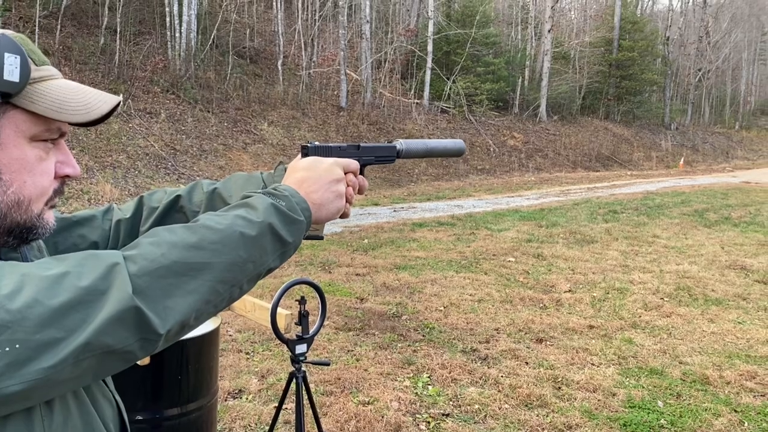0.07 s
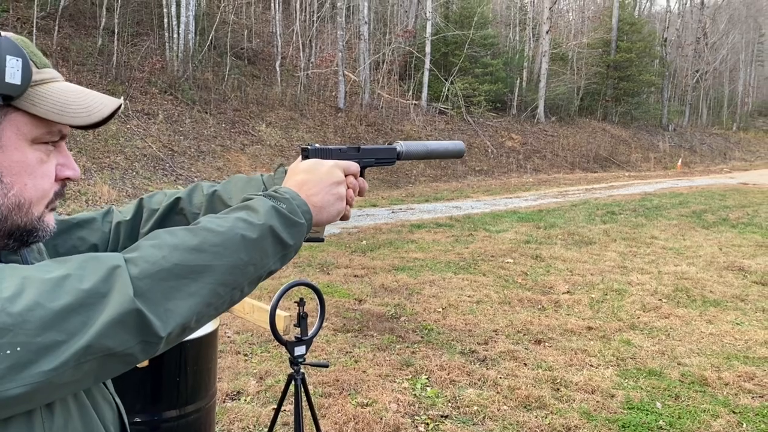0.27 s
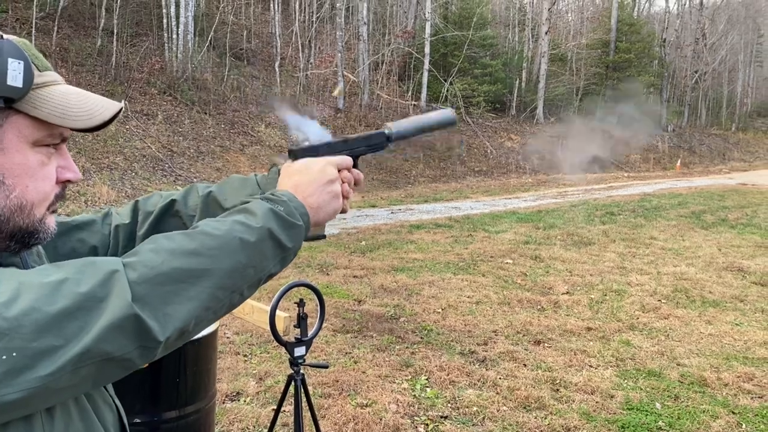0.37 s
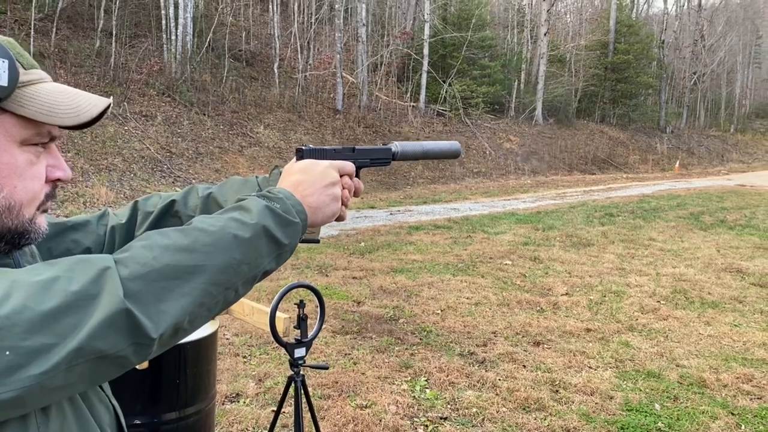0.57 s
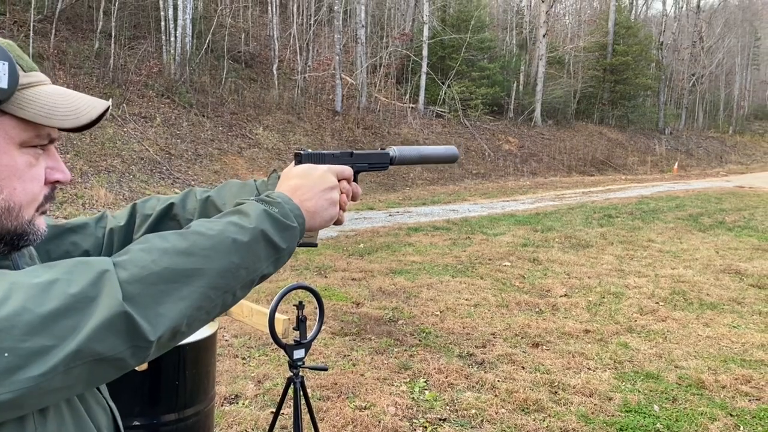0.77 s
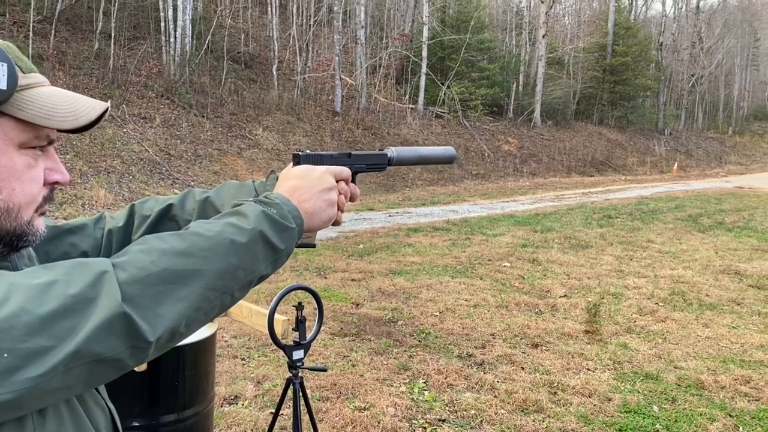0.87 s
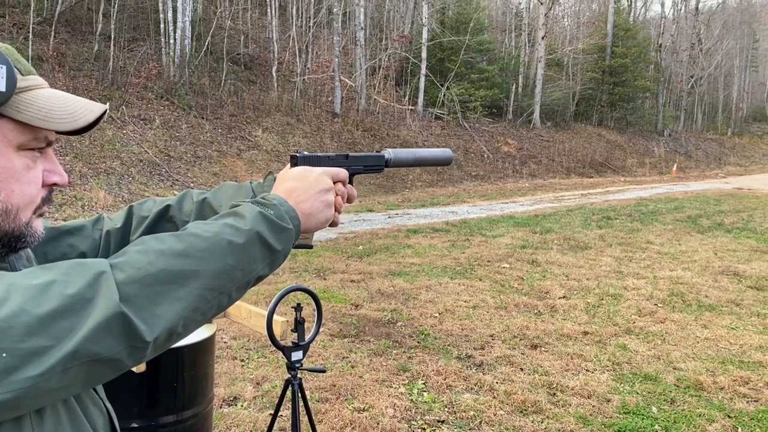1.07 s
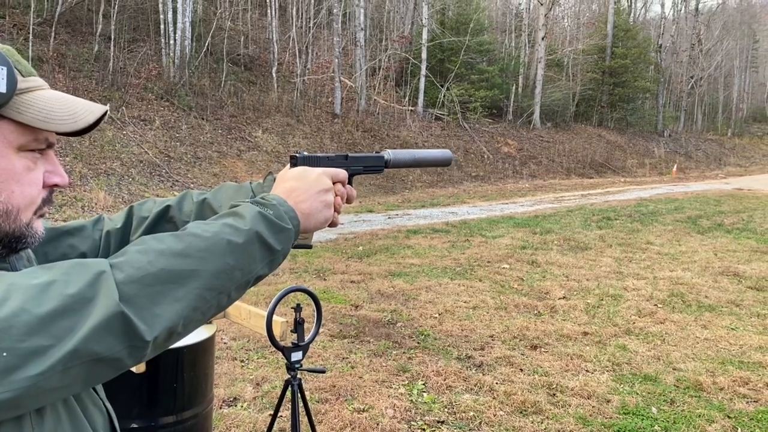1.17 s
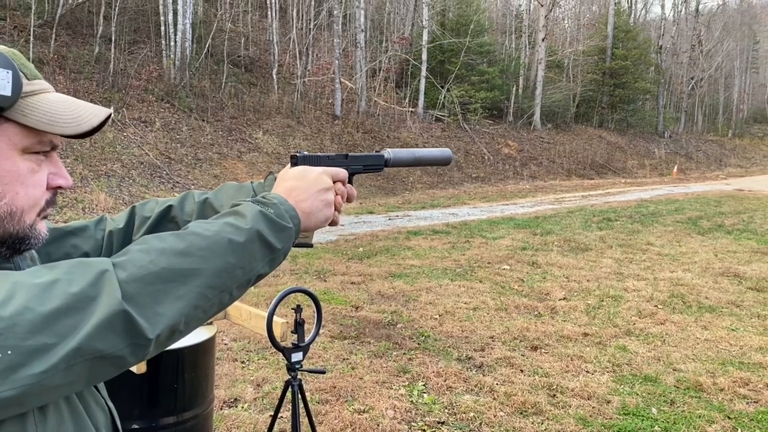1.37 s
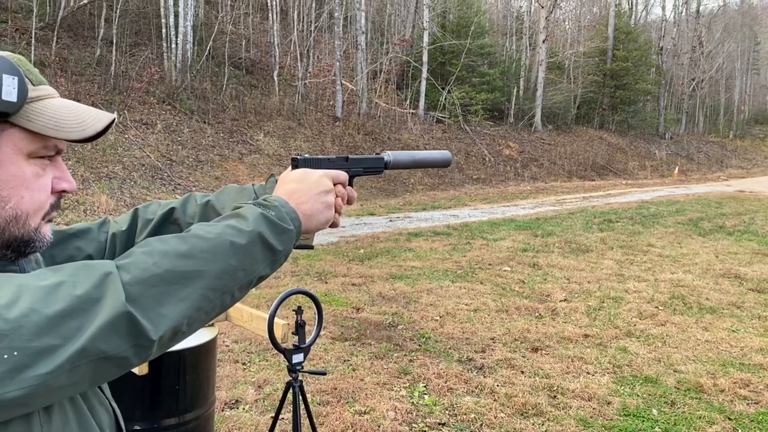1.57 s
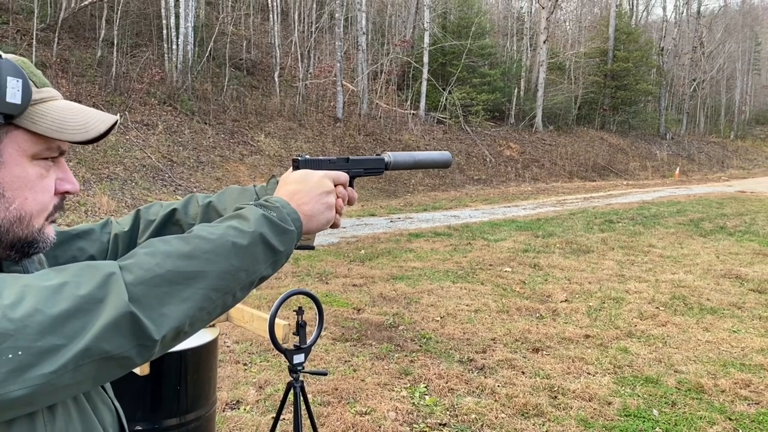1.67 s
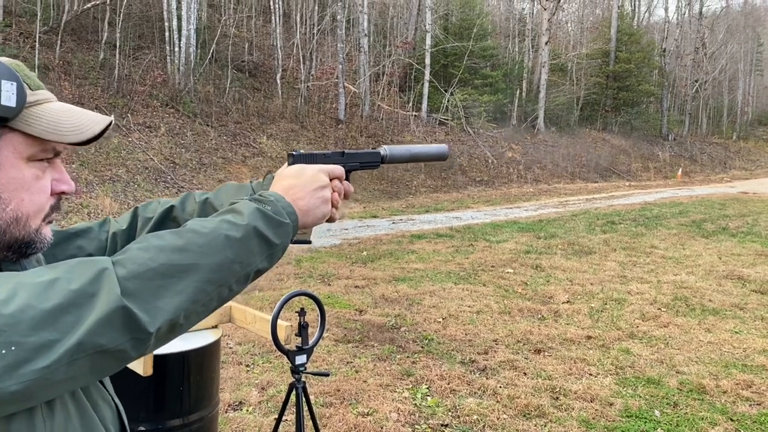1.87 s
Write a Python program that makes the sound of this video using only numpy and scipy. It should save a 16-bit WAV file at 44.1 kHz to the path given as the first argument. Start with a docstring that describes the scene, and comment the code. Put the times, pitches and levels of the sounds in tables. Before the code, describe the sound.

At a grassy outdoor range, a silenced pistol pops early and again near the end, close to the microphone. Its slide snaps shut, woods return a hissy tail, and faint metallic ticks sound over low wind.

```python
"""A grassy range below a wooded bank: two suppressed pistol shots are heard close to a hand-held phone.
Each is a short hiss of gas with uneven cracks and blunt low thumps, made of shaped noise and dying swings.
The slide rattles in lumpy noise and slams shut with a ring; noise echoes come off the bank and trees.
Small ticks (probably the trigger resetting and the spent case landing) are ringing tones and bands of noise.
Light wind is a lumpy rumble with low swings that buffet the microphone, over a quiet bed of air."""
import sys
import numpy as np
from scipy import signal
from scipy.fft import rfft, irfft
from scipy.io import wavfile
from scipy.ndimage import uniform_filter1d

SR = 44100
rng = np.random.default_rng(int(sys.argv[2]) if len(sys.argv) > 2 else 0)


def magnitude_from_level(level_db):
    """Linear magnitude for a level in decibels (20 dB per decade)."""
    exponent = np.asarray(level_db, float) / 20
    return 10 ** exponent


def generate_wav(sig):
    """Save sig (samples, or channels by samples) to the path in sys.argv[1] as 16-bit PCM at SR."""
    pcm = np.round(np.clip(np.atleast_2d(sig).T, -1, 1) * 32767).astype(np.int16)
    wavfile.write(sys.argv[1], SR, pcm)


N = 83790  # length in samples

# The two shots. Each row: start in seconds, gas level in dB, seconds until the slide shuts,
# brightness in dB per octave, level in dB of the hiss just ahead before it is dulled.
SHOTS = [(0.2292, -14.5, .0465, -2.5, -10.5), (1.6203, -14, .0463, 0.73, -25.5)]
# Tone colour of the gas blast. Each row: frequency in Hz, relative strength in dB per Hz.
BLAST_COLOUR = [(250, -34), (800, -7.5), (2930, -14.5), (3650, -9.5), (4460, -18.5), (7260, -17),
                (11200, -20.5), (13700, -33), (15200, -26), (16300, -49)]
# Tone colour of the slide's metal noise. Each row: frequency in Hz, relative strength in dB per Hz.
SLIDE_COLOUR = [(120, -41.5), (200, 0.5), (844, -12), (1940, -1.5), (7600, -9), (8970, -21), (10600, -11.5),
                (15600, -22.5), (16500, -39)]
# Slow rise and fall of the wind. Each row: time in seconds, level of the rumble in dB.
GUST = [(0, -50), (.1, -58), (0.202, -47), (.3, -63), (.42, -55), (0.579, -54), (0.701, -47.5),
        (.85, -45.5), (.93, -52), (1.03, -47), (1.13, -44), (1.21, -57.5), (1.27, -45), (1.34, -58),
        (1.42, -44), (1.56, -51.5), (1.72, -53.5), (1.9, -54.5)]


def evened(x):
    """Scales a signal so that its average power (mean square) is one."""
    return x / np.sqrt(np.mean(x ** 2) + 1e-20)


def read(points, hz):
    """Reads a table between its rows, with frequency on a logarithmic axis."""
    f, value = np.transpose(points)
    return np.interp(np.log(hz + 1), np.log(f + 1), value)


def add(mix, start_s, sound):
    """Mixes a sound in at start_s seconds, cutting off what runs past the end."""
    part = mix[..., round(start_s * SR):][..., :sound.shape[-1]]
    part += sound[..., :part.shape[-1]]


def noise(colour, size):
    """Two unrelated channels of noise, shaped in frequency by a colour table."""
    spectrum = rfft(rng.standard_normal((2, size)))
    shape = magnitude_from_level(read(colour, np.fft.rfftfreq(size, 1 / SR)))
    return evened(irfft(spectrum * shape, size))


def ring(modes, t):
    """A struck part sounds several dying tones at once, with random phases in each channel."""
    phases = rng.random((len(modes), 2, 1))
    out = 0
    for (hz, db, t60_s), phase in zip(modes, phases):
        out = out + magnitude_from_level(db - 60 * t / t60_s) * np.sin(2 * np.pi * (hz * t + phase))
    return out


def panned(sound, left_right_db):
    """Makes the left channel louder than the right by left_right_db."""
    return sound * magnitude_from_level(left_right_db * np.array([[.5], [-.5]]))


def tilted_blast(tilt_db):
    """Blast colour made brighter or duller by tilt_db per octave, pivoting at 1500 Hz."""
    return [(hz, db + tilt_db * np.log2(hz / 1500)) for hz, db in BLAST_COLOUR]


def spurt(db, t60_s):
    """One sharp crack of gas leaving the silencer: noise that starts almost at once and dies."""
    t = np.arange(4000) / SR
    rise = np.minimum(t / .0003, 1)
    return rise * magnitude_from_level(db - 60 * t / t60_s) * noise(tilted_blast(2), len(t))


def thump(db, hz, rise_s):
    """A blunt swing or two of pressure that swells for rise_s and then dies."""
    u = np.arange(6000) / SR / rise_s  # time counted in rises
    swell = (u * np.exp(1 - u)) ** 2
    return magnitude_from_level(db) * swell * np.sin(2 * np.pi * (hz * rise_s * u + rng.random()))


def gas_hiss(db, tilt_db, t):
    """Escaping gas hisses steadily for a few milliseconds, then dies away."""
    hold_s, t60_s = 0.0048, .03
    fade_db = 60 * np.maximum(t - hold_s, 0) / t60_s
    return magnitude_from_level(db - fade_db) * noise(tilted_blast(tilt_db), len(t))


def lead(db):
    """Dull hiss that swells briefly up to the blast."""
    t60_s = 0.029
    t = np.arange(1024)[::-1] / SR  # seconds left before the blast
    low_pass = signal.butter(4, 7500, fs=SR, output="sos")
    dull = signal.sosfilt(low_pass, noise(BLAST_COLOUR, len(t)))
    return magnitude_from_level(db - 60 * t / t60_s) * dull


def slide_rattle(shut_s, t):
    """The moving slide rattles as lumpy noise, which fades soon after it shuts."""
    level_db, fade_db, stop_t60_s = -30.5, -5, .07
    lumps = magnitude_from_level(4 * evened(uniform_filter1d(rng.standard_normal(len(t)), 50)))
    run_db = fade_db * np.minimum(t / shut_s, 1)
    stop_db = -60 * np.maximum(t - shut_s - .008, 0) / stop_t60_s  # starts 8 ms after shutting
    return magnitude_from_level(level_db + run_db + stop_db) * evened(lumps * noise(SLIDE_COLOUR, len(t)))


def slide_slam(t):
    """The slide slams shut: metal tones ring together with a short crack of noise."""
    # Tones of the struck slide. Each row: frequency in Hz, relative level in dB,
    # time to fall by 60 dB in seconds.
    slam_tones = [(1869, -10.5, 0.012), (2870, -9.5, 0.016), (4200, -7.5, 0.012), (6150, -5.5, 0.012),
                  (7600, -10, 0.0082), (9610, 8.5, 0.01)]
    crack = magnitude_from_level(-23 - 60 * t / 0.024) * noise(SLIDE_COLOUR, len(t))
    return np.minimum(t / .001, 1) * (magnitude_from_level(-24) * ring(slam_tones, t) + crack)


def near_bank(t):
    """Echo of the bank close by: noise that rises in 10 ms and dies."""
    # Tone colour of the bank's echo. Each row: frequency in Hz, relative strength in dB per Hz.
    bank_colour = [(88, -28.5), (150, -4), (293, -7.5), (1070, -14.5), (7220, -20.5), (11600, -31),
                   (13300, -48.5), (15300, -33), (16500, -47)]
    level_db, t60_s = -35.5, 0.19
    return np.minimum(t / .01, 1) * magnitude_from_level(level_db - 60 * t / t60_s) * noise(bank_colour, len(t))


def shot(gas_db, shut_s, tilt_db):
    """Gas hiss and slide rattle start together with the near echo; the slam follows after shut_s."""
    t = np.arange(SR // 2) / SR
    out = gas_hiss(gas_db, tilt_db, t) + slide_rattle(shut_s, t)
    add(out, shut_s, slide_slam(t))
    return out + near_bank(t)


def woods():
    """Long diffuse echo of the woods, slightly patchy; its highest treble dies soonest."""
    # Tone colour of the echo. Each row: frequency in Hz, relative strength in dB per Hz.
    woods_colour = [(180, -36.5), (300, -15), (807, -11), (1070, -16.5), (1660, -17.5), (10700, -18.5),
                    (12400, -22.5), (13000, -64.5), (15200, -39.5), (16500, -61.5)]
    # How long the echo lasts. Each row: frequency in Hz, time to fall by 60 dB in seconds.
    woods_t60 = [(500, 2.5), (1500, 3.6), (4000, 2.34), (8000, 1.1), (12000, .9)]
    level_db = -48
    # One tree line makes the echo swell; the swell in dB is halved at trees_half_hz.
    trees_s, trees_wide_s, trees_db, trees_half_hz = 0.386, 0.05, 8, 2160
    hz, t, cells = signal.stft(noise(woods_colour, N), SR, nperseg=512, noverlap=384)
    patches = rng.standard_normal(cells.shape[1:])
    patches = evened(uniform_filter1d(uniform_filter1d(patches, 10, 0), 10, 1))
    treble_cut = 1 + (hz[:, None] / trees_half_hz) ** 2
    t60_s = read(woods_t60, hz)[:, None]
    power = 0
    for start_s, *_ in SHOTS:
        age = np.maximum(t - start_s, 0)
        swell_db = trees_db * np.exp(-((age - trees_s) / trees_wide_s) ** 2) / treble_cut
        rise = np.minimum(age / .03, 1)
        power = power + rise * magnitude_from_level(level_db + swell_db - 60 * age / t60_s) ** 2
    shaped = cells * np.sqrt(power) * magnitude_from_level(2.0 * patches)
    return signal.istft(shaped, SR, nperseg=512, noverlap=384)[1][:, :N]


def click(ring_db, snap_db, left_right_db):
    """A small metal part struck twice in quick succession, with a dry snap of noise."""
    # Tones of the part. Each row: frequency in Hz, relative level in dB,
    # time to fall by 60 dB in seconds.
    click_tones = [(2400, -2, 0.0055), (5040, -15, 0.0046), (6400, -14, 0.0021), (7340, 6.5, 0.0052),
                   (10200, 4.5, 0.00637), (10880, -7.5, 0.0056), (15320, -21.5, 0.0051)]
    # Tone colour of the snap. Each row: frequency in Hz, relative strength in dB per Hz.
    snap_colour = [(900, -13), (3500, 2), (10000, -5), (11800, -29.5)]
    twice_s, snap_t60_s = 0.00047, .007
    t = np.arange(2000) / SR
    out = np.minimum(t / 0.0002, 1) * ring(click_tones, t)
    add(out, twice_s, np.minimum(t / 0.0001, 1) * ring(click_tones, t))
    snap = magnitude_from_level(snap_db - 60 * t / snap_t60_s) * noise(snap_colour, len(t))
    snap *= np.minimum(t / 0.00053, 1)
    return panned(magnitude_from_level(ring_db) * out + snap, left_right_db)


def tick(db, hz, t60_s, left_right_db):
    """A soft tick or rustle: a band of noise that starts fast and dies."""
    t = np.arange(SR // 4) / SR
    band = []
    for k in range(-4, 4):
        slope_db = -6.0 if k < 0 else -30.0  # much steeper above the centre than below
        band.append((hz * np.exp(k * .62), slope_db * k * k))
    out = np.minimum(t / 0.00074, 1) * noise(band, len(t)) * magnitude_from_level(db - 60 * t / t60_s)
    return panned(out, left_right_db)


def knock(db, hz, t60_s):
    """A dull knock: one dying tone whose pitch falls."""
    t = np.arange(2000) / SR
    sag = 0.24  # share of the pitch that can be lost
    pitch = hz * (1 - sag + sag * np.exp(-9.5 * t / t60_s))
    tone = magnitude_from_level(-60 * t / t60_s) * np.sin(2 * np.pi * np.cumsum(pitch) / SR)
    return magnitude_from_level(db) * np.minimum(t / 0.00072, 1) * tone


BUFFET_TURNS = 1.05  # a buffet swells to its top in this many turns of its pitch at the top


def buffet(db, hz, phase):
    """Wind pushes the microphone: a swing or two of pressure with falling pitch."""
    sag = 0.3
    u = np.arange(0, 7, hz / SR / BUFFET_TURNS)  # time, with the top at one
    turns = np.cumsum(hz * (1 - sag + sag * np.exp(1 - u))) / SR
    swell = (u * np.exp(1 - u)) ** 3
    return magnitude_from_level(db) * swell * np.sin(2 * np.pi * (turns + phase))


def rumble():
    """Low wind noise that follows the gusts and swells in slow random lumps."""
    # Tone colour of the wind. Each row: frequency in Hz, relative strength in dB per Hz.
    wind_colour = [(21, -32), (35, -2), (70, 4), (150, -7.5), (192, -5), (263, -14), (372, -34), (400, -28),
                   (520, -60), (880, -120)]
    at_s, gust_db = np.transpose(GUST)
    slow = uniform_filter1d(uniform_filter1d(rng.standard_normal(N), 700), 500)
    lumps = magnitude_from_level(2 * evened(slow))
    level = magnitude_from_level(np.interp(np.arange(N) / SR, at_s, gust_db))
    return level * evened(lumps * noise(wind_colour, N)[0])


def add_flutter(out):
    """Many small buffets at random times, louder where the gusts are."""
    per_s, below_gust_db, middle_hz = 110, -10.5, 312
    at_s, gust_db = np.transpose(GUST)
    for when, size, pitch, phase in rng.random((round(per_s * N / SR), 4)):
        start_s = when * N / SR
        db = np.interp(start_s, at_s, gust_db) + below_gust_db + 7 * size
        add(out, start_s, buffet(db, middle_hz * np.exp(.8 * (pitch - .5)), phase))


def wind():
    """Lumpy low rumble, with large and small buffets on the microphone, alike in both channels."""
    # The large buffets. Each row: time of the top in seconds, peak level in dB,
    # pitch at the top in Hz.
    large_buffets = [(0.172, -33, 103), (0.5393, -38, 137), (0.6295, -35, 100), (0.6599, -39.5, 104),
                     (0.7291, -37, 296), (0.7334, -35, 153), (0.8066, -39.5, 370), (0.8578, -39, 130),
                     (0.898, -40, 130), (0.9798, -36, 400), (0.993, -35.5, 163), (0.9947, -38.5, 446),
                     (1.058, -38, 390), (1.0794, -33.5, 375), (1.088, -35, 145), (1.093, -40.5, 480),
                     (1.118, -33.5, 562), (1.1246, -40, 148), (1.1467, -33, 268), (1.1517, -37.5, 152),
                     (1.28, -35, 330), (1.283, -35, 189), (1.442, -37, 151), (1.4456, -44.5, 393),
                     (1.5336, -39.5, 335), (1.551, -43.5, 372), (1.8359, -39.5, 287), (1.8492, -41, 425),
                     (.155, -40, 153), (0.484, -39, 91), (.771, -40, 140), (1.1778, -41.5, 117),
                     (1.396, -40.5, 92), (1.546, -41, 125), (1.683, -36, 290), (1.702, -40.5, 252)]
    out = rumble()
    for top_s, db, hz in large_buffets:
        add(out, top_s - BUFFET_TURNS / hz, buffet(db, hz, rng.random()))
    add_flutter(out)
    return out


def air():
    """The quiet air of the field: faint steady noise."""
    # Tone colour of the air. Each row: frequency in Hz, relative strength in dB per Hz.
    air_colour = [(150, -30), (250, -3.5), (330, -17.5), (557, -10.5), (1220, -24.5), (1530, -24.5),
                  (5630, -40), (11300, -46.5), (16000, -65)]
    return magnitude_from_level(-67.5) * noise(air_colour, N)


def scene():
    """Places shots, clicks, ticks and a knock over the far echo, wind and air."""
    # Uneven cracks of gas. Each row: start in seconds, level in dB, time to fall by 60 dB in seconds.
    spurts = [(0.2294, -7, .011), (.2345, -6, .010), (0.2409, -19.5, 0.022), (1.6207, -5, .012),
              (1.6237, -7.5, 0.0092), (1.6264, -5.5, 0.0073), (1.6278, -13.5, .012), (1.6318, -18, .035)]
    # Low swings of pressure. Each row: time of the top in seconds, peak level in dB,
    # pitch in Hz, rise in seconds.
    thumps = [(0.2321, -10, 591, .0017), (0.2336, -8.5, 260, 0.0021), (.240, -18.5, 113.1, 0.0045),
              (1.6245, -14, 649.7, .0024), (1.6278, -15.5, 251.1, 0.0027), (1.643, -34, 141, 0.00474)]
    # Dry double clicks, probably trigger reset and spent case. Each row: start in seconds,
    # gain of the ring in dB, level of the snap in dB, left over right in dB.
    clicks = [(0.3917, -34, -35.5, -2), (0.8009, -48.5, -30.5, -1), (1.7375, -36.5, -42, -4.5)]
    # Soft ticks and rustles in the leaves. Each row: start in seconds, level in dB,
    # centre in Hz, time to fall by 60 dB in seconds, left over right in dB.
    ticks = [(0.328, -43, 2300, 0.035, 0), (.803, -58, 5160, 0.016, -1), (0.799, -59.5, 5050, 0.33, 0),
             (.836, -55.5, 7040, 0.012, -7), (.8425, -44, 7200, 0.016, -1), (.85, -61.5, 5830, 0.44, -2),
             (1.116, -47.5, 2400, 0.0084, -1), (1.116, -48, 5000, 0.0064, -2),
             (1.116, -59.5, 11100, 0.027, 4), (1.135, -69.5, 6580, 0.071, -2),
             (1.373, -66.5, 11600, 0.056, 3)]
    # Dull knock under one tick. Each row: start in seconds, level in dB, starting pitch in Hz,
    # time to fall by 60 dB in seconds.
    knocks = [(1.1157, -33.5, 1266, 0.0092)]
    out = woods() + wind() + air()
    for start_s, *settings, lead_db in SHOTS:
        add(out, start_s, shot(*settings))
        add(out, start_s - 1024 / SR, lead(lead_db))  # ends where the blast starts
    for top_s, db, hz, rise_s in thumps:
        add(out, top_s - rise_s, thump(db, hz, rise_s))
    for source, rows in ((spurt, spurts), (click, clicks), (tick, ticks), (knock, knocks)):
        for start_s, *settings in rows:
            add(out, start_s, source(*settings))
    return out


def band_limit(x):
    """A steep low-pass at the top of the band."""
    return signal.sosfilt(signal.butter(12, 17010, fs=SR, output="sos"), x)


def record(dry):
    """Loud peaks are softly rounded; the bass is made mono and the treble stays wide."""
    ceiling = 0.94
    soft = ceiling * np.tanh(dry / ceiling)
    mid = soft.mean(0)
    side = (soft[0] - soft[1]) / 2
    high_pass = signal.butter(3, 900, "high", fs=SR, output="sos")
    side = magnitude_from_level(-1) * signal.sosfiltfilt(high_pass, side)
    return band_limit(np.array([mid + side, mid - side]))


dry = scene()
out = record(dry)
generate_wav(out)
```